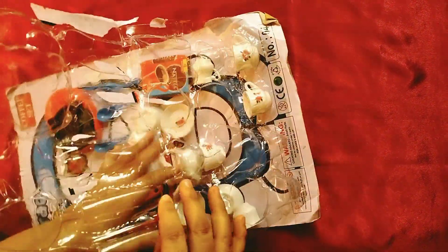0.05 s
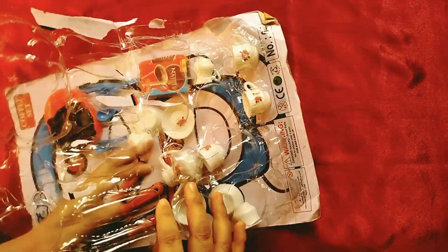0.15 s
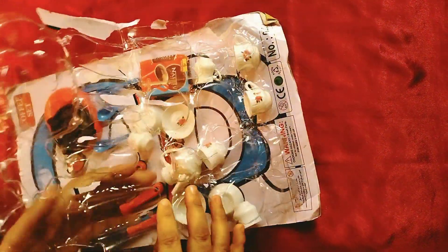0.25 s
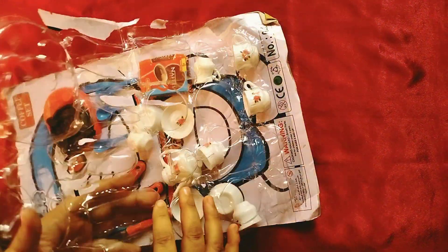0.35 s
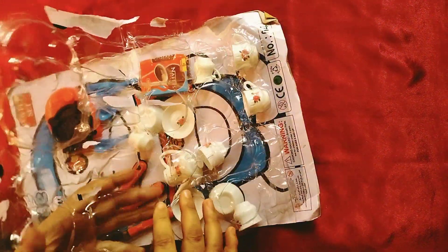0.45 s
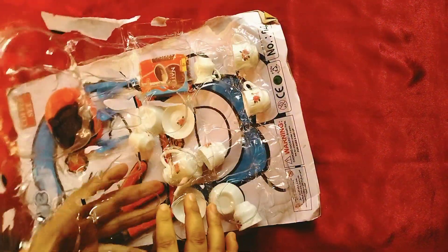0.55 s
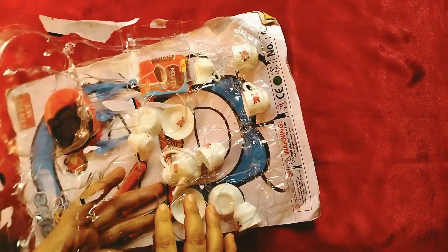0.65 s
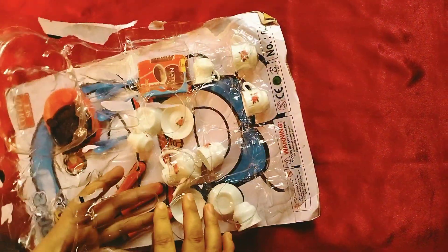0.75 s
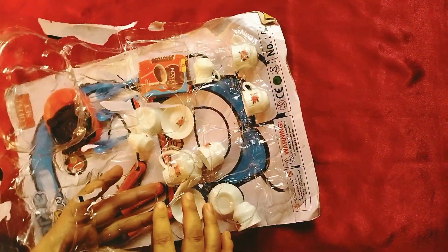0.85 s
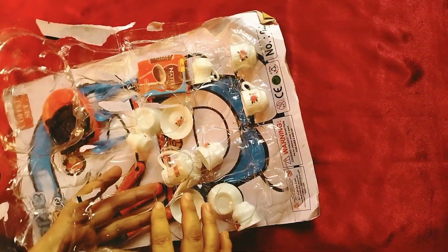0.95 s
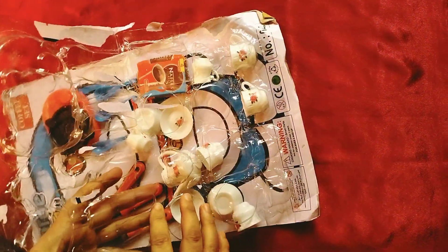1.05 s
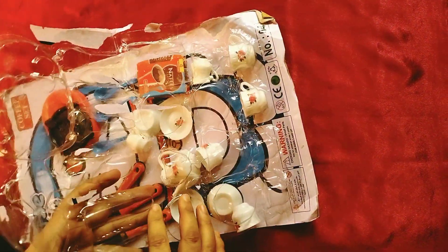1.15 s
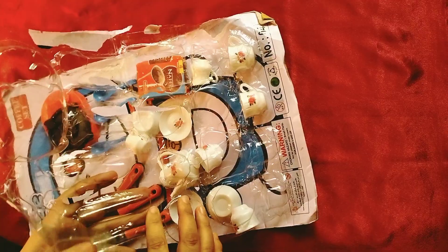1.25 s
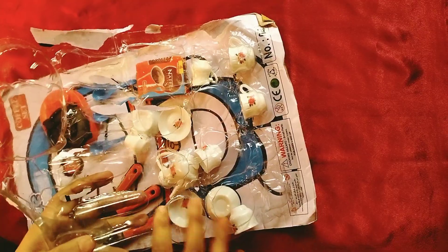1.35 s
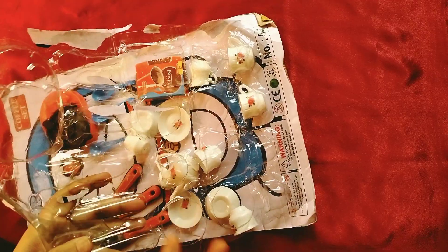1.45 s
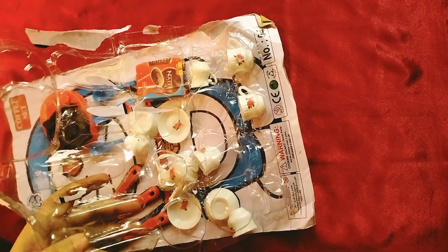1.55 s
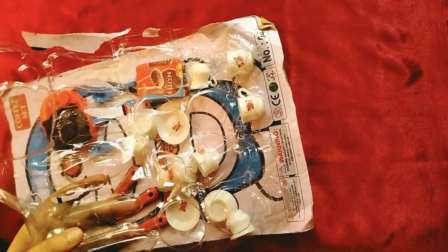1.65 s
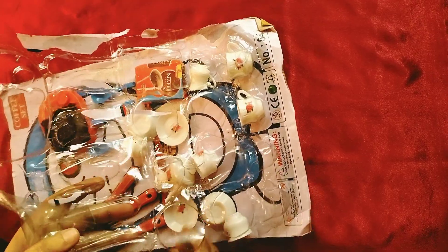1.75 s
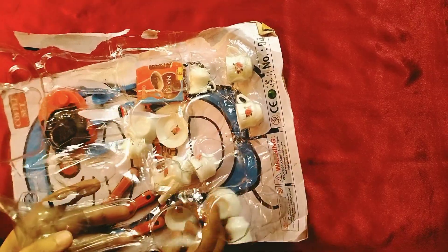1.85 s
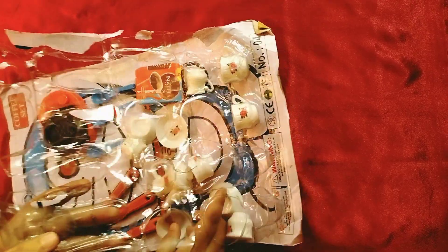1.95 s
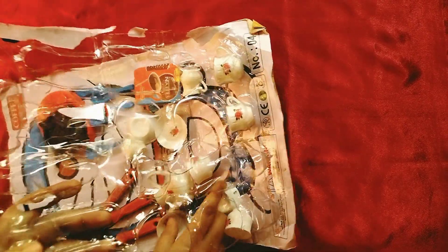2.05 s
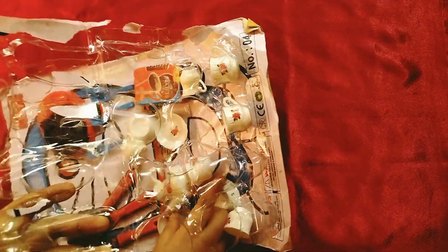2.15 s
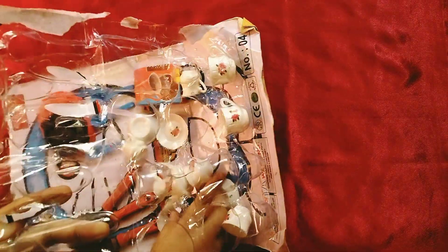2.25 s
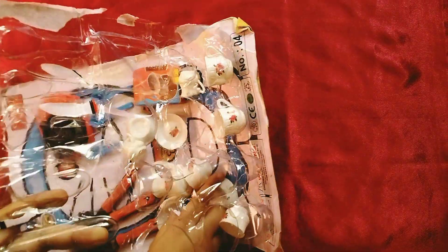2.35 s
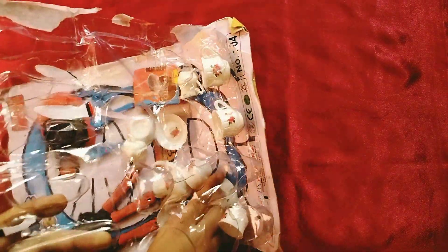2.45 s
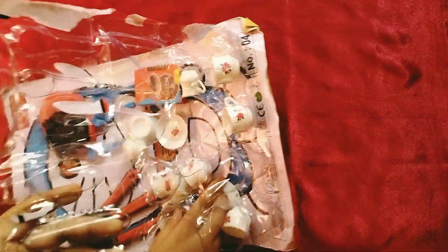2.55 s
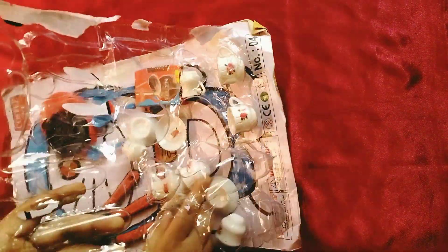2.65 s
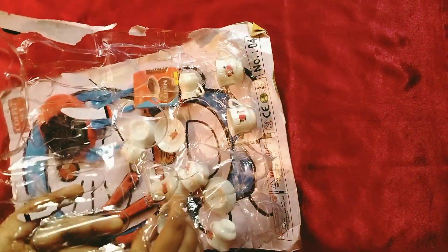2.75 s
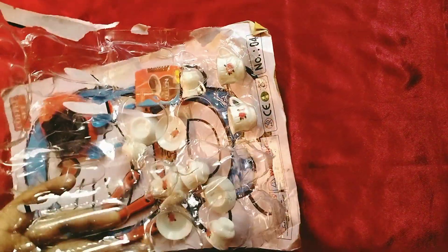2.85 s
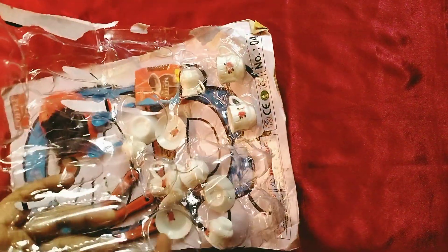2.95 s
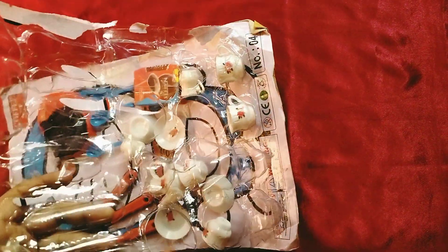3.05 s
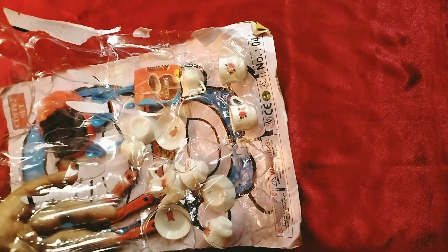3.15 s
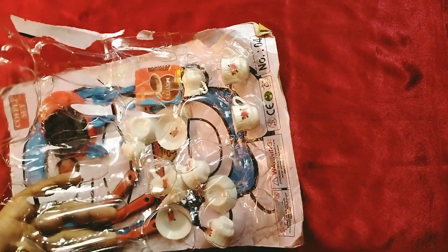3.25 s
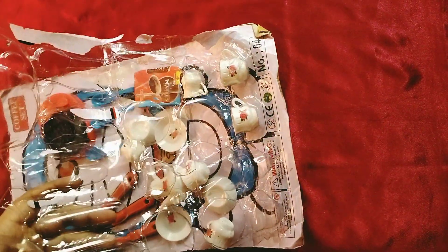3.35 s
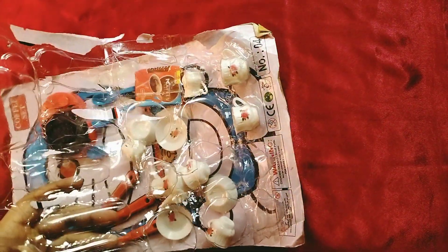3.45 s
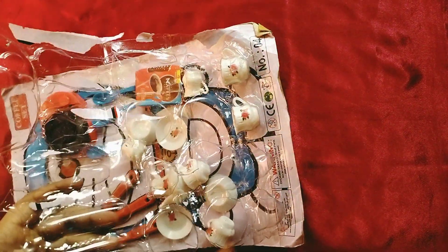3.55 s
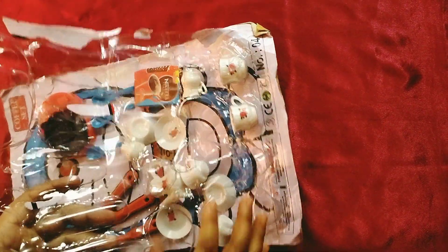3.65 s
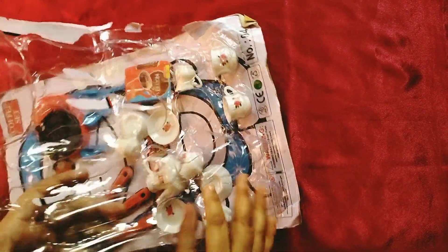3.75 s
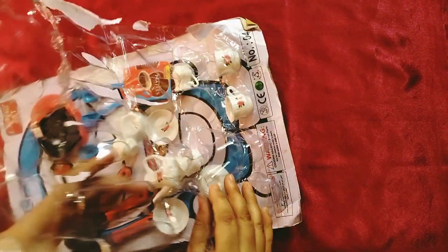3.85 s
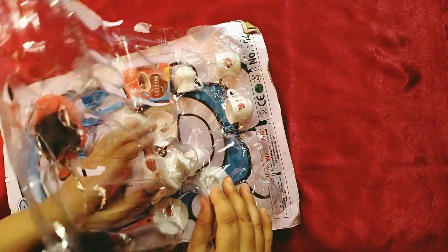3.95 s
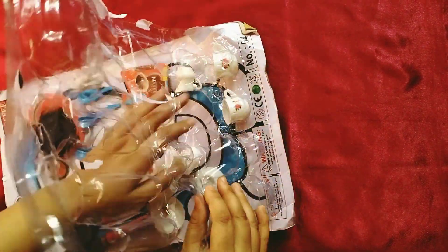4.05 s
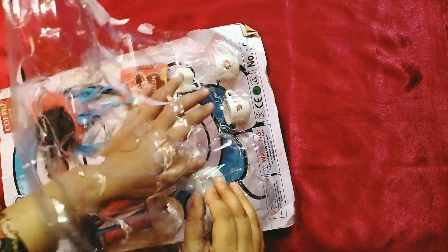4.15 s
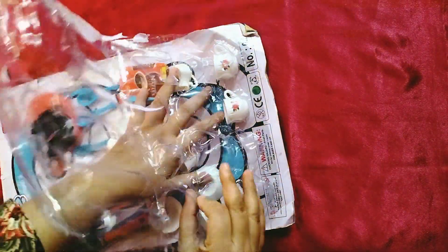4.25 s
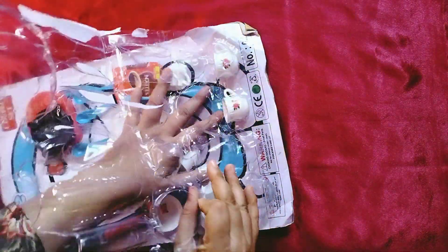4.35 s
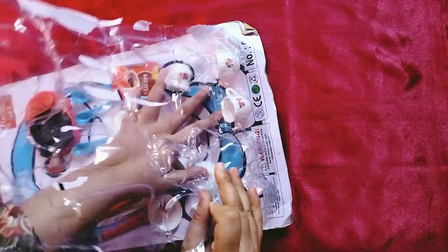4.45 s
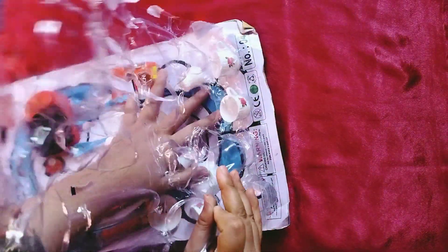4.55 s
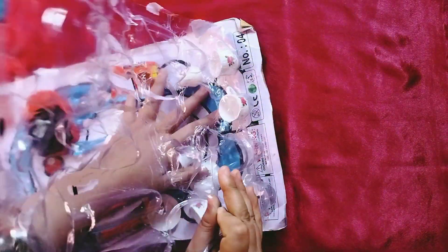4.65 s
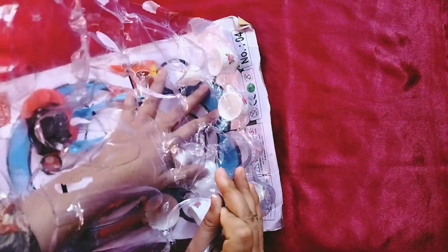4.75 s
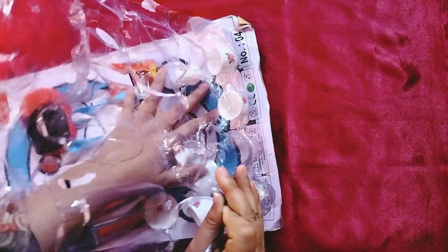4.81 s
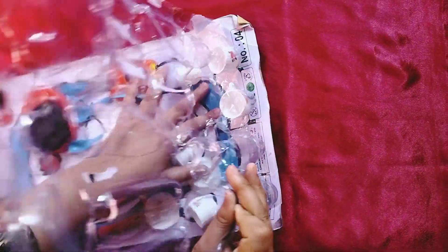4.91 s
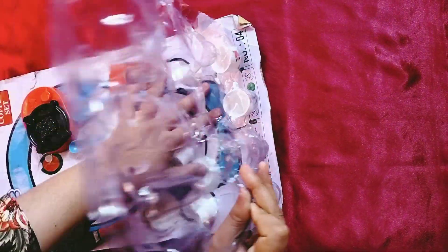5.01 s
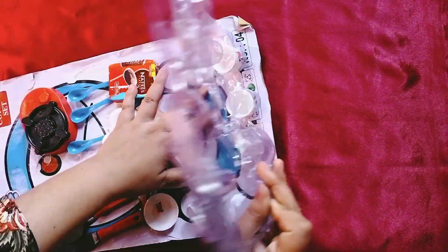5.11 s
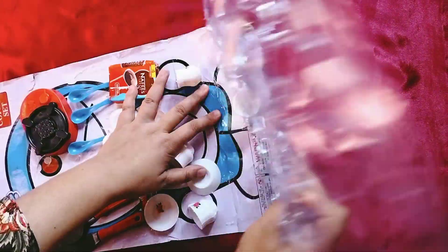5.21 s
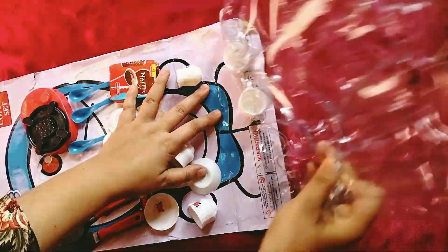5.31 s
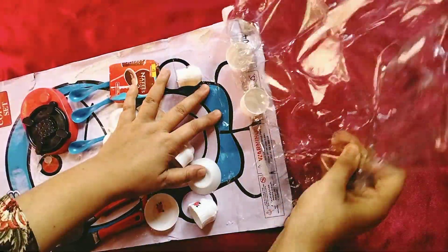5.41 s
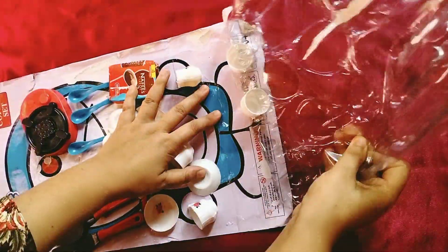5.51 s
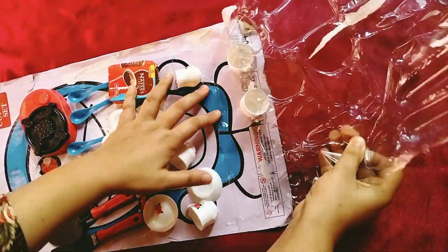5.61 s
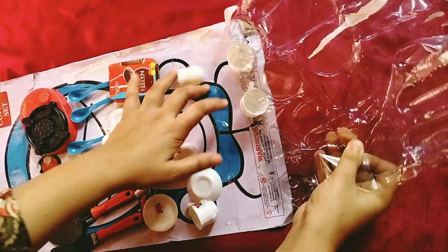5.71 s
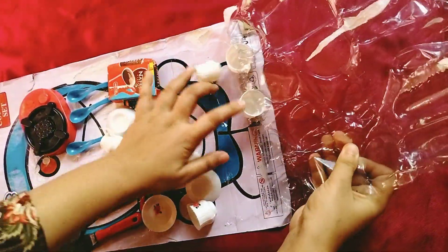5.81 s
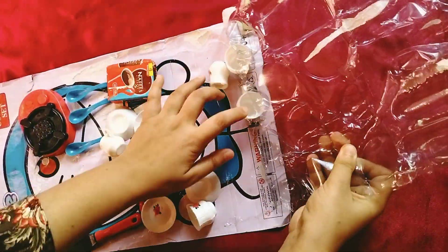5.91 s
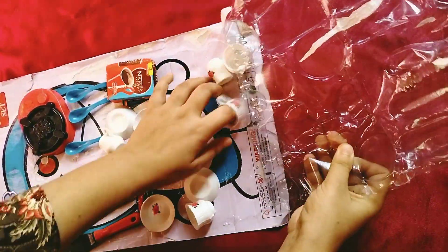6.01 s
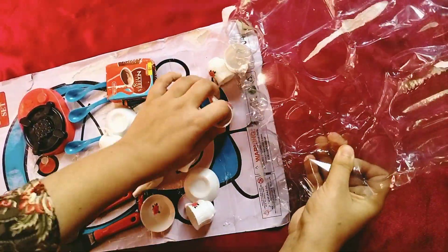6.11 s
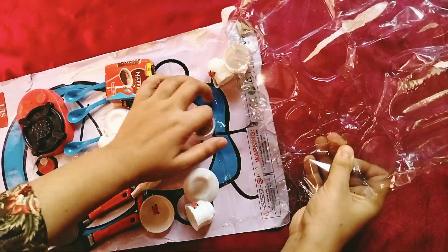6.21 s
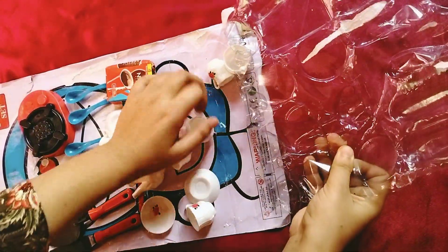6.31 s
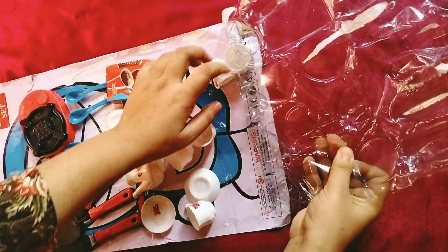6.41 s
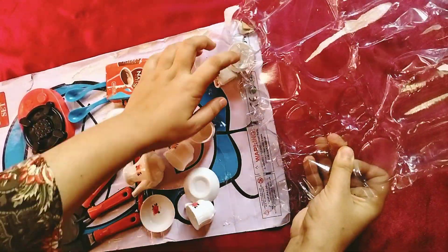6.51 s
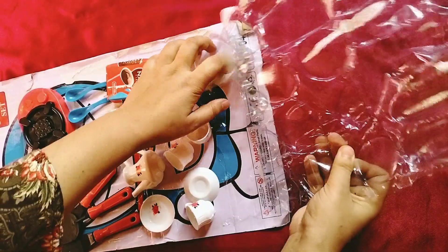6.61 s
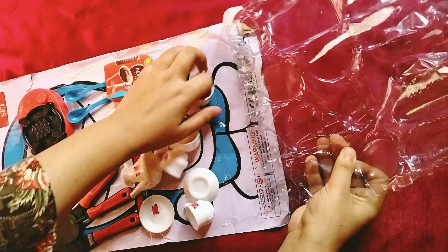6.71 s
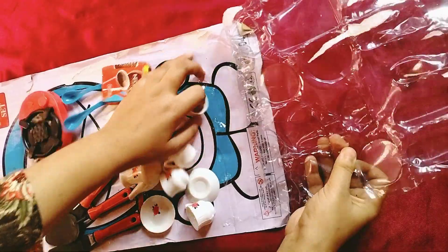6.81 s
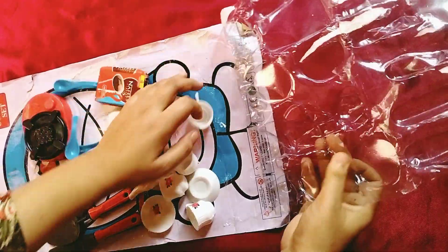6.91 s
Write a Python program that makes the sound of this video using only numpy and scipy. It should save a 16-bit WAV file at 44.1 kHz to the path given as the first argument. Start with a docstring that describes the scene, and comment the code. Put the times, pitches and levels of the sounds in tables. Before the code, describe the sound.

Close stereo pickup of hands peeling a stiff clear plastic cover from a carded toy tea set. Sharp snaps and rubs start at once, thin out and briefly stop, then return sparsely and thicken. A hard knock lands near three seconds. Crackling then crowds together, with another knock before five seconds, a short lull after six, and a last burst of pops. Small quiet room.

```python
"""Hands work a stiff clear plastic cover off a toy tea set lying on its card on a cloth-covered table.
Snaps and rubs come at once, thin out after 0.2 s, pause from about 0.8 s to 1.1 s, return sparsely and
thicken from 1.8 s, with a hard knock near 3 s, then ease. From 3.7 s to 6.1 s they crowd, with a second
hard knock at 4.8 s; after a lull a last group follows. Creases burst and ring as filtered noise and
dispersed pulses, slips make crinkle and rubbing, knocks are swelling sines with noise; a small room's
noise tail answers, and a close microphone pair listens."""
import sys
import numpy as np
from scipy import signal
from scipy.fft import rfft, irfft, next_fast_len
from scipy.io import wavfile
from scipy.ndimage import uniform_filter1d

SR = 44100
rng = np.random.default_rng(int(sys.argv[2]) if len(sys.argv) > 2 else 0)


def unload_wav(signal):
    """Save mono or channel-first audio to the path in sys.argv[1] as 16-bit WAV at rate SR, clipped to [-1, 1]."""
    wavfile.write(
        sys.argv[1],
        SR,
        np.round(np.clip(np.atleast_2d(signal).T, -1, 1) * 32767).astype(np.int16),
    )


N = 307377
SNAP_SIZE = 2048  # samples per burst
MID_SIDE_SIGNS = np.array([[1], [-1]])


def from_db(db):
    """Decibels to gain."""
    return 10 ** (np.asarray(db) / 20)


def rms_one(x):
    """Scale to unit rms."""
    return x / np.sqrt(np.mean(x ** 2) + 1e-20)


def at_hz(points, hz):
    """Interpolate a curve on a log-frequency axis."""
    knots_hz, values = np.transpose(points)
    return np.interp(np.log(np.maximum(hz, 1)), np.log(knots_hz), values)


def band(x, low_hz, high_hz, order=2):
    """Causal Butterworth band-pass."""
    edges_hz = [low_hz, min(high_hz, SR / 2 - 1000)]
    return signal.sosfilt(signal.butter(order, edges_hz, "band", fs=SR, output="sos"), x)


def coloured(x, spectrum):
    """Zero-phase filter with a gain curve in dB."""
    size = next_fast_len(x.shape[-1])
    gain = from_db(at_hz(spectrum, np.fft.rfftfreq(size, 1 / SR)))
    return irfft(rfft(x, size) * gain, size)[..., :x.shape[-1]]


def resonance(x, hz, width_hz):
    """Two-pole resonance with gain 1 on top."""
    r = np.exp(-np.pi * width_hz / SR)
    zeros = np.array([1, 0, -1]) * (1 - r * r) / 2
    poles = [1, -2 * r * np.cos(2 * np.pi * hz / SR), r * r]
    return signal.lfilter(zeros, poles, x + 1e-18)


def add(out, start_s, sound):
    """Mix a sound in at a time."""
    start = int(np.clip(round(start_s * SR), 0, N - 1))
    out[..., start:start + sound.shape[-1]] += sound[..., :N - start]


def air(level_db=-67.5):
    """Steady background noise, mostly common to both microphones and strongest in the bass."""
    # Each row: frequency in Hz, gain in dB.
    air_spectrum = [(20, 1), (400, -8), (3000, -31.5), (16000, -26.5)]
    noise = rng.standard_normal(N) + 0.24 * rng.standard_normal((2, N))
    return from_db(level_db) * rms_one(coloured(noise, air_spectrum))


def room(x, first_echo_s=0.0015, bass_alike=0.66, alike_below_hz=1400):
    """A diffuse tail dies band by band; its bass is more alike at both microphones."""
    # Decay of the room. Each row: frequency in Hz, t60 in s.
    t60_points = [(150, 0.67), (700, 0.18), (4000, 0.3), (15000, 0.096)]
    # Colour of the tail. Each row: frequency in Hz, gain in dB.
    colour_points = [(100, 9), (330, 6.7), (1100, 3.9), (2200, 1), (15000, 0.5)]
    t, response = np.arange(SR // 2) / SR, 0
    edges_hz = np.geomspace(60, 17000, 13)
    for low_hz, high_hz in zip(edges_hz, edges_hz[1:]):
        hz = np.sqrt(low_hz * high_hz)
        mid, side = band(rng.standard_normal((2, len(t))), low_hz, high_hz)
        alike = np.clip(bass_alike, 0, 1) / (1 + (hz / alike_below_hz) ** 2)
        onset = np.clip(t / first_echo_s - 1, 0, 1)
        fade = from_db(-60 * t / at_hz(t60_points, hz)) * onset
        common = np.sqrt(1 + alike) * rms_one(mid * fade)
        opposed = np.sqrt(1 - alike) * rms_one(side * fade) * MID_SIDE_SIGNS
        gain = from_db(at_hz(colour_points, hz)) * np.sqrt(high_hz - low_hz)
        response = response + (common + opposed) * gain
    return signal.fftconvolve(x, rms_one(response) / np.sqrt(len(t)), axes=1)[:, :N]


def bumps(width=0.31, thud_db=-11):
    """The card lands on cloth: a soft thump, sine plus band noise, swells and dies quickly."""
    # Knocks on the table. Each row: start in s, level at the top of the swell in dB, pitch in Hz,
    # swell time in s.
    bump_rows = [(1.825, -39, 138, 0.0087), (2.973, -17.5, 362, 0.0057), (3.636, -40.5, 116.4, 0.038),
                 (3.905, -37.5, 95, 0.0098), (4.169, -35, 165, 0.0076), (4.843, -18, 151, 0.0059),
                 (5.07, -33, 169, 0.0085), (5.449, -35, 101, 0.012), (6.307, -23, 400, 0.0023)]
    out, t = np.zeros(N), np.arange(SR // 4) / SR
    for start_s, level_db, hz, swell_s in bump_rows:
        thud = rms_one(band(rng.standard_normal(len(t)), hz * width, hz * 2.9))
        swing = np.sin(2 * np.pi * hz * t) + from_db(thud_db) * thud
        age = t / swell_s
        add(out, start_s, from_db(level_db) * swing * (age * np.exp(1 - age)) ** 2)
    return out


def handling():
    """Rub and crinkle levels in dB: each move builds up, holds and lets go; the strongest leads."""
    # A hand presses, slides or pulls. Each row: start in s, length in s, relative rubbing level in dB,
    # relative fine crinkle level in dB.
    moves = [(0, 0.0047, -25.5, -37), (0.124, 0.061, -31.5, -39), (0.196, 0.15, -36.5, -69),
             (0.342, 0.15, -51.5, -44.5), (1.183, 0.038, -47, -55.5), (1.296, 0.079, -40.5, -46.5),
             (1.446, 0.0064, -39.5, -52), (1.532, .13, -54.5, -53.5), (1.828, 0.02, -28.5, -35.5),
             (2.058, .4, -44.5, -53), (2.525, .12, -36, -39), (2.637, 0.27, -40, -53),
             (2.985, 0.15, -43.5, -42), (3.255, 0.019, -40, -43), (3.76, 0.044, -40, -35.5),
             (3.836, 0.1, -33.5, -34), (3.937, .11, -40.5, -44.5), (4.23, 0.082, -32.5, -31),
             (4.363, .13, -42.5, -42), (4.53, .17, -33.5, -29), (4.817, 0.15, -37.5, -33.5),
             (5.02, 0.55, -47, -43), (5.455, 0.059, -27, -28), (5.55, 0.26, -36, -35),
             (5.908, 0.13, -43.5, -45.5), (6.064, 0.077, -32.5, -34.5), (6.156, .08, -37, -58),
             (6.295, 0.04, -36, -68), (6.473, .1, -46, -66), (6.595, 0.094, -36.5, -42),
             (6.725, .23, -31, -34.5)]
    rise_db_per_s, fall_db_per_s = 601, 351  # the grip builds fast and lets go more slowly
    rub_db, crinkle_db = -74, -76.5  # hands lying still on the pack
    time_s = np.arange(N) / SR
    for start_s, length_s, move_rub_db, move_crinkle_db in moves:
        before_s = np.maximum(start_s - time_s, 0)
        after_s = np.maximum(time_s - start_s - length_s, 0)
        grip_db = -rise_db_per_s * before_s - fall_db_per_s * after_s
        rub_db = np.maximum(rub_db, move_rub_db + grip_db)
        crinkle_db = np.maximum(crinkle_db, move_crinkle_db + grip_db)
    return rub_db, crinkle_db


def burst(length_s, after_s, after_db, apart, rise_s=0.0005165, travel_s=0.000928, direct_db=-4):
    """A kink sends one bending wave across the sheet, treble first; scattered reflections ring on."""
    t, hz = np.arange(SNAP_SIZE) / SR, np.fft.rfftfreq(SNAP_SIZE, 1 / SR)
    decay = np.exp(-(t / length_s) ** 2) + from_db(after_db) * np.exp(-t / after_s)
    shape = decay * (1 - np.exp(-t / rise_s))
    # bending-wave speed grows with the root of frequency; travel_s holds at 1 kHz
    turns = 2 * travel_s * np.sqrt(1000 * hz) + rise_s * hz + rng.random()
    direct = irfft(np.exp(-2j * np.pi * turns)) * (t < t[-1] / 2)
    mid, side = rng.standard_normal((2, SNAP_SIZE))
    scattered = shape / np.linalg.norm(shape) * (mid + apart * side * MID_SIDE_SIGNS)
    return from_db(direct_db) * direct + scattered


def placed(pair, chance, left_lead_s=.00008, lead_spread_s=.00009):
    """Each crease lies in its own direction, so it can reach one microphone first."""
    lead = (left_lead_s + lead_spread_s * chance) * SR
    delays = [int(round(max(lag, 0))) for lag in (-lead, lead)]
    return np.array([np.pad(side, (delay, 0))[:SNAP_SIZE] for side, delay in zip(pair, delays)])


def grains(spectrum, per_s, spread_db, length_s, apart, even_s, low_hz, high_hz,
           ring_db=14, ring_q=2.3, count=60):
    """Tiny uneven slips come at random from many facets, each with its own pitch; level about 1."""
    born = np.flatnonzero(rng.random(N) < per_s / SR)
    sizes = from_db(spread_db * np.minimum(rng.exponential(1, N), 3)) * rng.choice([-1, 1], N)
    place, out, facets = rng.integers(0, count, N), np.zeros((2, N)), []
    for hz in np.geomspace(low_hz, high_hz, count):
        wave = burst(length_s, after_s=.004, after_db=-9, apart=apart)
        ringing = wave + from_db(ring_db) * resonance(wave, hz, hz / ring_q)
        facets.append(placed(ringing, rng.standard_normal()))
    for i in born:
        add(out, i / SR, sizes[i] * facets[place[i]])
    out = coloured(out, spectrum)
    # even out the level over a sliding window
    power = uniform_filter1d(np.mean(out ** 2, axis=0), int(even_s * SR))
    return out / np.sqrt(np.maximum(power, 0) + power.mean() / 100)


def rubbing(level_db, trim_db=-6.5):
    """The card rubs on the table: dense low-pitched slips follow the hands."""
    # Each row: frequency in Hz, gain in dB.
    rub_spectrum = [(35, -30), (110, -7), (180, -1), (350, -4), (490, -1), (750, -4), (1200, -5.5),
                    (1800, -11), (4000, -49)]
    slips = grains(rub_spectrum, per_s=260, spread_db=6.0, length_s=0.003, apart=0.22, even_s=0.1,
                   low_hz=204, high_hz=1580)
    return from_db(level_db + trim_db) * slips


def crinkling(level_db, trim_db=3.5):
    """Fine creases in the plastic: bright, wide slips follow the hands."""
    # Each row: frequency in Hz, gain in dB.
    crinkle_spectrum = [(500, -24), (1000, -3.5), (1600, -3.5), (2400, -6), (5000, -12), (9000, -22),
                        (12500, -18), (16000, -28)]
    slips = grains(crinkle_spectrum, per_s=260, spread_db=3.5, length_s=0.004, apart=0.79, even_s=0.055,
                   low_hz=900, high_hz=15000)
    return from_db(level_db + trim_db) * slips


def snaps(ring_db=4, ring_q=4, apart=0.38, card_db=-14, card_low_hz=240, card_high_hz=450):
    """Buckling creases burst in three registers; facet pitch rings and splits energy body to crack."""
    # Buckling creases. Each row: start in s, relative level in dB, fizz in dB re that level,
    # ring of the buckled facet in Hz.
    snap_rows = [(0.003, -21, -31, 2400), (0.084, -21, -23, 2200), (0.095, -27, -8, 1190),
                 (0.127, -28.5, -10.5, 1440), (0.136, -17, -8.5, 3000), (0.149, -21, -4.5, 2080),
                 (0.194, -20.5, -11.5, 2540), (0.246, -39.5, -13, 800), (0.35, -20, -3, 4400),
                 (0.412, -13.5, -9.5, 1090), (0.509, -31.5, -23, 1610), (0.615, -22, -32, 910),
                 (0.675, -33.5, -10, 4070), (0.763, -21.5, -19.5, 1420), (1.144, -38, -39, 1140),
                 (1.179, -34.5, -38, 1460), (1.269, -28.5, -29, 1340), (1.294, -29, -8, 3150),
                 (1.352, -21.5, -14, 3400), (1.36, -31.5, 5, 1120), (1.513, -35.5, -45, 2740),
                 (1.572, -28.5, 0, 2900), (1.705, -26.5, -25.5, 1260), (1.795, -32.0, -23, 980),
                 (1.83, -18, -6, 1740), (1.842, -28, -27, 720), (1.924, -22.5, -6.5, 3760),
                 (1.937, -14, -13, 5760), (1.953, -16.5, -11, 1320), (2.081, -30, -40, 565),
                 (2.089, -34, -37, 1600), (2.145, -34, -36, 1000), (2.188, -23, -12.5, 3400),
                 (2.201, -22.5, -15.5, 2170), (2.256, -25, -18, 3350), (2.297, -18.5, -23, 2780),
                 (2.4, -23.0, -13, 1510), (2.45, -27.0, -18, 1800), (2.502, -22, -7, 2830),
                 (2.529, -16.5, -12, 3250), (2.551, -24, 1, 1460), (2.574, -16, -7.5, 2780),
                 (2.662, -25, -17, 1050), (2.701, -29, -16, 2440), (2.766, -24, -18, 1190),
                 (2.777, -23, -25, 2100), (2.819, -21.0, -26, 1550), (2.881, -25, -4, 2610),
                 (2.977, -16.5, -8.5, 1050), (2.994, -13.5, -12, 2920), (3.126, -30.5, -28, 1690),
                 (3.269, -21.5, -29, 2540), (3.419, -27.5, -17, 1980), (3.46, -31, -5, 2760),
                 (3.667, -43, -38, 2610), (3.714, -22, -19, 1400), (3.77, -22, -19.5, 2530),
                 (3.83, -25, -25, 900), (3.85, -17.5, -15, 2300), (3.894, -19, -23, 1100),
                 (3.977, -24.5, -8.5, 2530), (3.993, -32, -18, 1980), (4.017, -17.5, -14, 2240),
                 (4.115, -27.5, -18, 1800), (4.174, -28.5, -27, 1840), (4.207, -31.5, -4.5, 2320),
                 (4.282, -18.0, -5, 3640), (4.297, -17.5, -8, 1500), (4.337, -29, 0, 3900),
                 (4.378, -14.5, -14, 2540), (4.395, -27, -9, 1070), (4.422, -25.5, -32, 2110),
                 (4.445, -16.5, -10, 2850), (4.458, -23, -7, 1600), (4.508, -24, -39, 900),
                 (4.579, -19, -13, 2130), (4.588, -16.5, -13, 3380), (4.661, -17.5, -17.5, 2400),
                 (4.68, -20.5, -5, 5670), (4.699, -24.5, -5, 1510), (4.771, -16.5, -10, 2770),
                 (4.806, -41, -4, 2380), (4.828, -14.5, -4, 2340), (4.853, -20, -7.5, 1900),
                 (4.914, -22, -3.5, 3000), (4.924, -29.5, 7, 1910), (4.947, -17, -4, 2920),
                 (5.037, -15.5, -7.5, 2230), (5.069, -21.5, -2.5, 2480), (5.153, -22.5, -13, 2100),
                 (5.207, -17, -7.5, 3760), (5.229, -23, -8, 2820), (5.309, -20, -15, 3190),
                 (5.378, -24, -23, 2540), (5.458, -16.0, -12, 1540), (5.478, -14, -6.5, 3400),
                 (5.495, -13, -7, 3100), (5.544, -18.5, -12.5, 1760), (5.587, -19.5, -16, 1720),
                 (5.594, -25, -6, 1110), (5.673, -20.5, -8.5, 1420), (5.709, -17.5, -12.5, 1670),
                 (5.786, -26.5, -8, 1120), (5.877, -22, -13, 2020), (5.897, -15, -5.5, 1900),
                 (5.972, -31.5, 2.5, 1510), (6.017, -27, -31, 1740), (6.091, -17.5, -10, 2500),
                 (6.103, -18.5, -25, 1180), (6.133, -14, -8.5, 784), (6.152, -25, -29, 845),
                 (6.259, -36, 8.5, 2740), (6.44, -44, -5, 4430), (6.518, -38, -30, 716),
                 (6.574, -26, -13, 1740), (6.612, -28.5, -4.5, 1190), (6.654, -17.5, -3.5, 1180),
                 (6.738, -13, -20, 1400), (6.787, -21, -26, 1150), (6.798, -19, -3.5, 3270),
                 (6.86, -13, -16.5, 1630), (6.939, -18.5, -5, 1830)]
    # Body, crack and fizz. Each row: low edge in Hz, high edge in Hz, burst length in s,
    # after-ring decay in s, after-ring level in dB.
    registers = [(418.6, 2240, 0.00055, 0.0042, -1), (1162, 5530, 0.0018, 0.0033, -3),
                 (5310, 13940, 0.0022, 0.009, -19.5)]
    hollow_below_hz, hollow_steepness = 1523, 3.36  # wide facets sound hollow, small ones crack
    blister_hz, blister_width_hz, blister_db = 756, 360, -5.5  # the dome that the snap sits in
    out = np.zeros((2, N))
    level_span = .005 * SR  # rms taken as if all energy fell within 5 ms
    for start_s, level_db, fizz_db, hz in snap_rows:
        snap, direction = 0, rng.standard_normal()
        hollow = 1 / (1 + (hz / hollow_below_hz) ** hollow_steepness)
        gains = np.sqrt(hollow), np.sqrt(1 - hollow), from_db(fizz_db)
        for k, (gain, register) in enumerate(zip(gains, registers)):
            low_hz, high_hz, length_s, after_s, after_db = register
            wave = burst(length_s, after_s, after_db, apart)
            wave = wave + from_db(ring_db) * resonance(wave, hz, hz / ring_q)
            part = band(wave, low_hz, high_hz, order=3)
            if k == 0:  # the body rings in its blister and shakes the card underneath
                part = part + from_db(blister_db) * resonance(part, blister_hz, blister_width_hz)
                card = rms_one(band(wave, card_low_hz, card_high_hz))
                part = rms_one(part) + from_db(card_db) * card
            snap = snap + gain * rms_one(part) * np.sqrt(level_span / SNAP_SIZE)
        add(out, start_s, from_db(level_db) * placed(snap, direction))
    return out


def shell(x):
    """The moulded blisters lend their resonances to everything that shakes them."""
    # Each row: frequency in Hz, width in Hz, level in dB (gain less 1 is added to the direct sound).
    shell_modes = [(305, 76, 3.5), (408, 84, 6), (681, 120, 5), (819, 130, 6), (2148, 350, 3.5)]
    return x + sum((from_db(db) - 1) * resonance(x, hz, width_hz) for hz, width_hz, db in shell_modes)


def scene(bump_wet_db=-5, room_db=-10, cover_db=2.5):
    """Snaps, crinkle, rubbing and bumps in a quiet room."""
    rub_db, crinkle_db = handling()
    rub = rubbing(rub_db)
    crinkle = crinkling(crinkle_db)
    cover = from_db(cover_db) * shell(snaps() + rub + crinkle)
    knocks = bumps()
    tail = from_db(room_db) * room(cover + from_db(bump_wet_db) * knocks)
    return cover + knocks + tail + air()


def record(dry):
    """Each microphone adds its colour, peaks are rounded by tanh and the top is cut."""
    # Colour of the pair. Each row: frequency in Hz, left minus right in dB.
    mic_balance = [(60, 0.5), (110, 2), (200, -1.0), (380, -2.5), (700, 3.5), (1290, -0.5), (2380, -2.0),
                   (4400, 2), (8120, -0.5), (15000, 1)]
    ceiling, cutoff_hz = .95, 16400
    heard = []
    for x, share in zip(dry, (.5, -.5)):
        heard.append(coloured(x, [(hz, share * db) for hz, db in mic_balance]))
    rounded = ceiling * np.tanh(np.array(heard) / ceiling)
    return signal.sosfilt(signal.ellip(10, .2, 80, cutoff_hz, fs=SR, output="sos"), rounded)


dry = scene()
out = record(dry)
unload_wav(out)
```